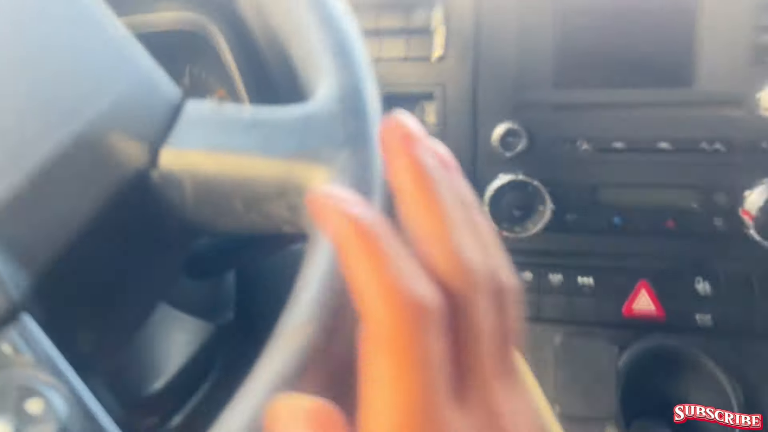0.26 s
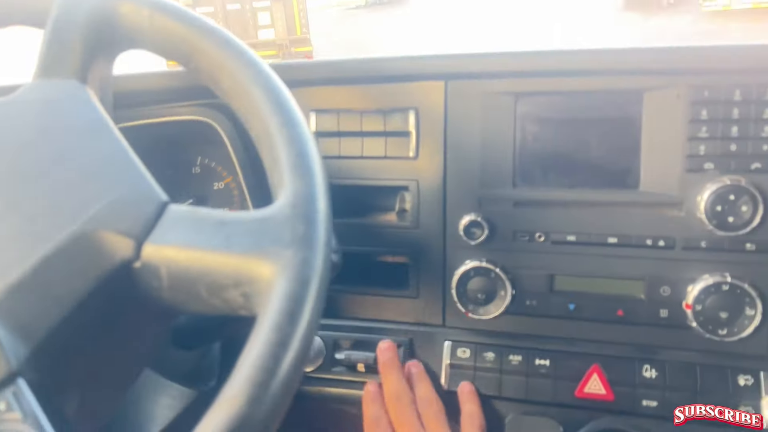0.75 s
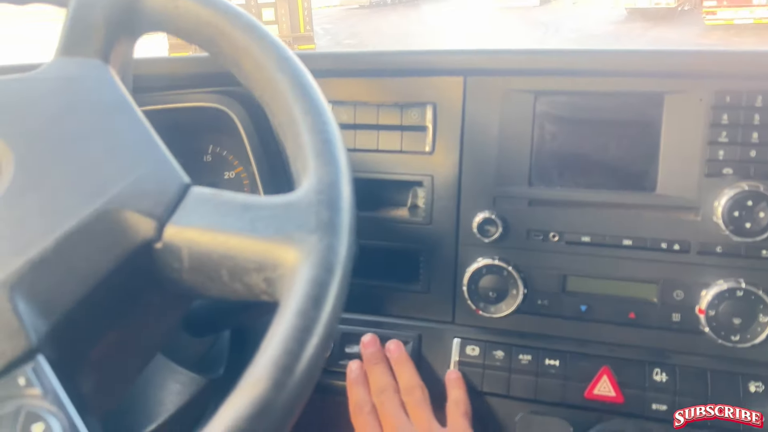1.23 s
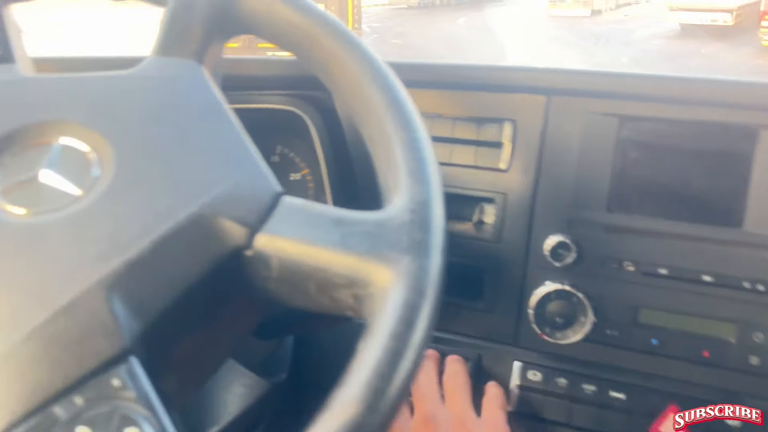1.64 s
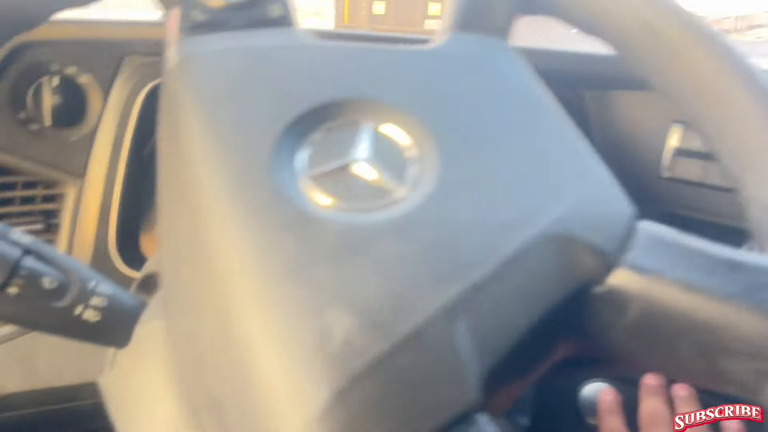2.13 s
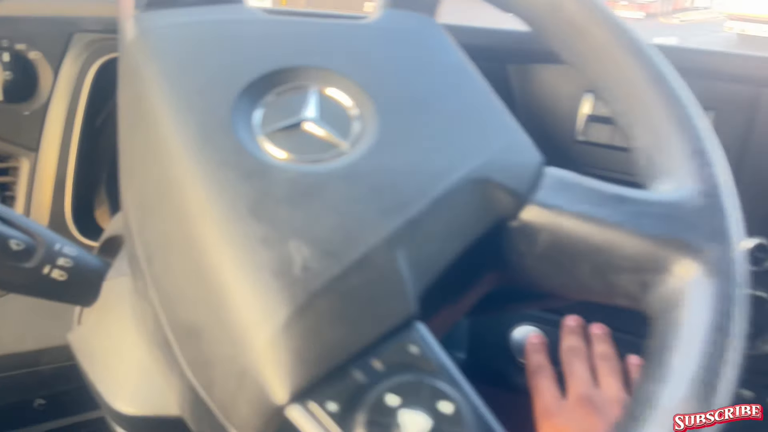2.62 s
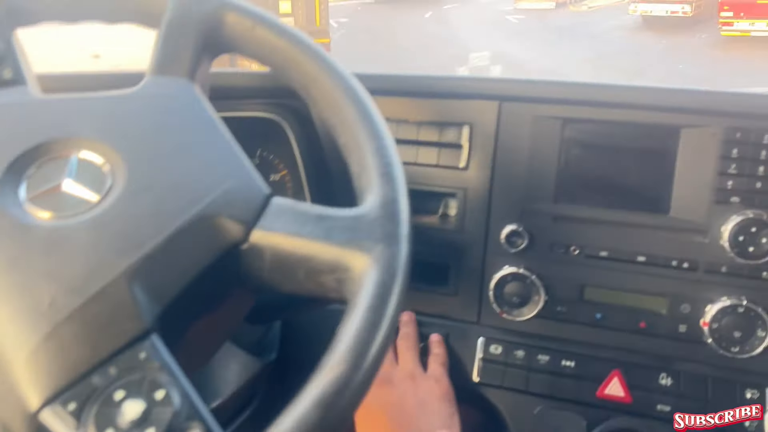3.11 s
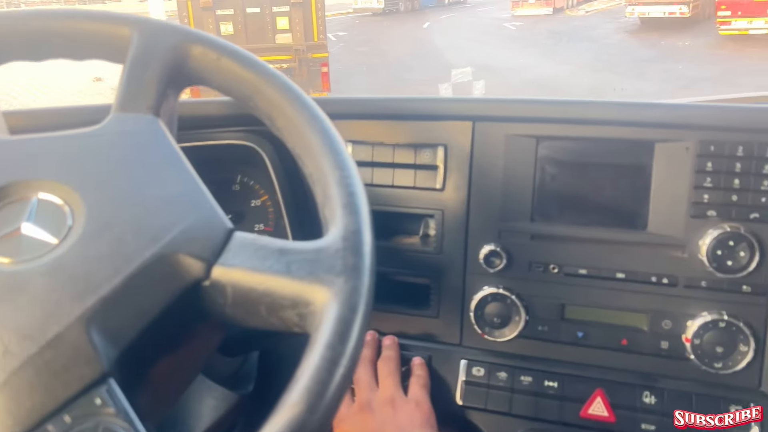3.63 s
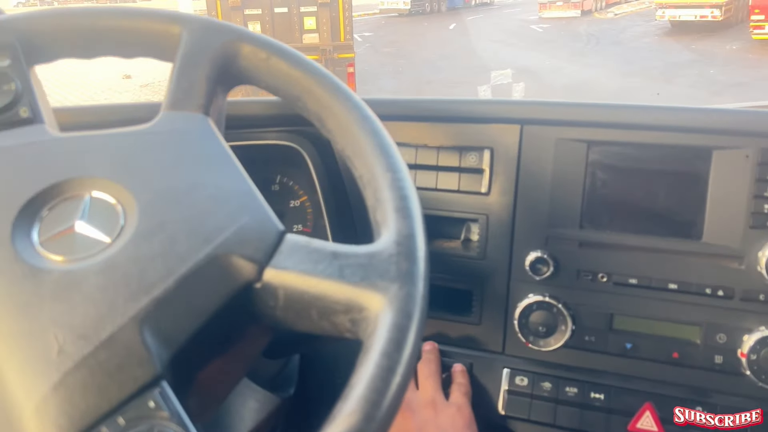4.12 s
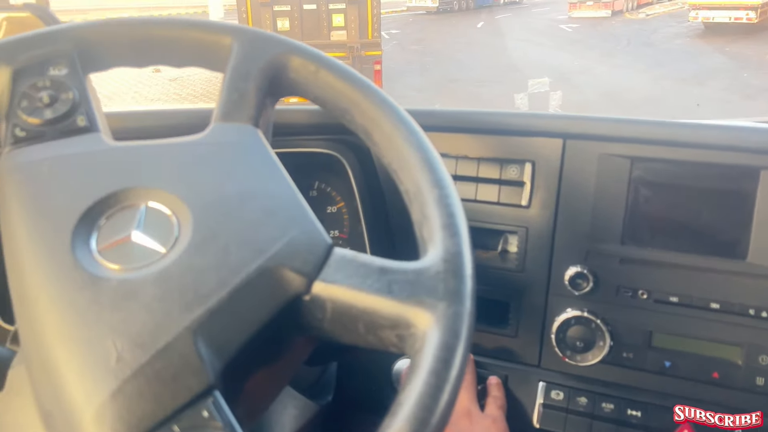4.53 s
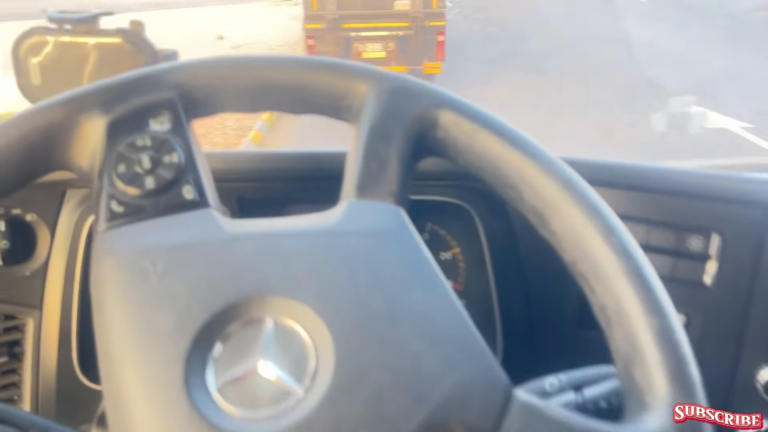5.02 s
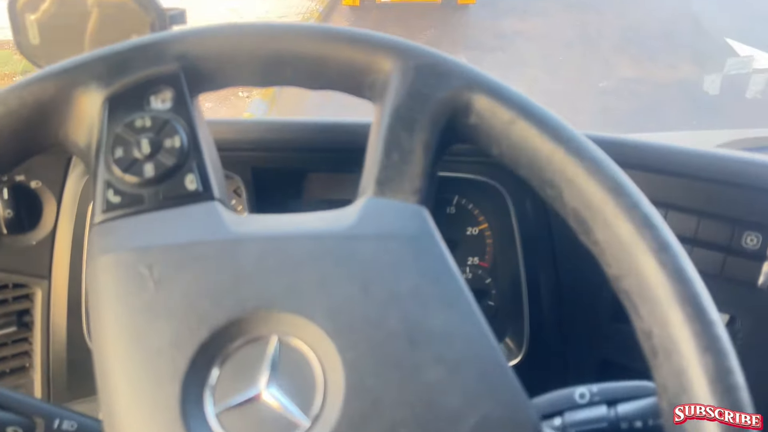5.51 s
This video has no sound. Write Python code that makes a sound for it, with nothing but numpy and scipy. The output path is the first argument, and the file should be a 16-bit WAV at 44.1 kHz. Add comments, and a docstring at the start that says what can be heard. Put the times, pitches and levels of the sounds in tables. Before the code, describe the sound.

A large diesel engine idles throughout, a deep, uneven, throbbing rumble heard inside a small truck cab, with faint air blowing from a vent more to the right. At the very start the handheld microphone is bumped hard, giving low, muffled thumps until about 0.3 s, with clicks and a strong rubbing hiss, as of a sleeve or hand, coloured by thin gliding squeaks until about 0.8 s. The drone dips briefly around 0.4 to 0.7 s. Small plastic clicks at 0.75 and 1.0 s lead to a sharp lever snap with a dull thud near 1.23 s. Softer rubbing hiss and light knocks return from 1.7 to 2.4 s, and a low hum swells around 2.3 to 2.8 s. A crisp double click comes at 3.4 s, as the lingering hiss stops. A duller knock follows at 3.9 s, then faint taps near 4.5 s and a tiny chirp at 4.7 s over the continuing idle.

```python
"""Inside the cab of a six-cylinder diesel truck at idle, heard from a phone held behind the steering wheel.
Beating hums and a rumble that throbs with the firings fill the cab; coloured noise blows from a vent.
The phone is bumped (decaying low swings); a hand works a lever on the dashboard. Bursts of rubbing hiss, as
of a sleeve or hand sliding, are noise with coloured resonances and thin whistles; the lever snaps home with
a thud, and plastic parts click as struck resonances amid scrapes and soft rubs of banded noise."""
import sys
import numpy as np
from scipy import signal
from scipy.fft import rfft, irfft
from scipy.io import wavfile
from scipy.ndimage import uniform_filter1d

SR = 44100
rng = np.random.default_rng(int(sys.argv[2]) if len(sys.argv) > 2 else 0)


def wrap_up_sound(samples):
    """Save the sound to the file named by the first command line argument, as 16-bit audio."""
    columns = np.atleast_2d(samples).T
    # keep every value between -1 and 1, then stretch to whole-number steps
    tamed = np.clip(columns, -1, 1)
    steps = np.round(tamed * 32767).astype(np.int16)
    wavfile.write(sys.argv[1], SR, steps)


N = 253575
T = np.arange(N) / SR


def undb(db):
    """Decibels to gain."""
    return 10 ** (np.asarray(db) / 20)


def unit(x):
    """Scale to rms 1."""
    return x / np.sqrt(np.mean(x ** 2))


def over_hz(rows, f):
    """Linear interpolation of (Hz, value) rows on a log-frequency axis."""
    hz, value = np.transpose(rows)
    return np.interp(np.log(f + 1), np.log(hz), value)


def colour(rows):
    """Spectral envelope: gain over frequency, closed below its first point."""
    return lambda f: undb(over_hz(rows, f)) * np.minimum(f / rows[0][0], 1) ** 2


def resonances(rows):
    """Superposition of resonance peaks: gain over frequency of (Hz, width, dB) rows."""
    return lambda f: sum(undb(db) / (1 + ((f - hz) / width) ** 2) for hz, width, db in rows)


def band(hz, width_hz):
    """Gain over frequency of a single resonance."""
    return resonances([(hz, width_hz, 0)])


# likeness of the two microphones in the cab's sound field, held within -1 to 1 in use:
# pitch_hz, correlation
LIKENESS = [(60, 0.92), (120, 0.79), (220, 0.85), (380, 0.56), (650, -0.23), (1400, 0.15), (2500, -0.067),
            (4500, 0.25), (5600, -0.39), (7300, 0.95), (9400, -1.75), (12000, 1), (14400, -1.4)]


def noise(gain, size=N, direct=0):
    """Spatial coherence: stereo noise of rms 1, more alike at the two microphones when the source is direct."""
    f = np.fft.rfftfreq(size, 1 / SR)
    alike = np.clip(direct + (1 - direct) * over_hz(LIKENESS, f), -1, 1)
    spectra = rfft(rng.standard_normal((2, size))) * gain(f)
    mid, side = spectra * np.sqrt([1 + alike, 1 - alike])
    return unit(irfft([mid + side, mid - side], size))


def walk(rate):
    """Slow random modulation of rms 1: levels held 1 / rate s and smoothed twice."""
    hold = int(SR / rate)
    steps = np.repeat(rng.standard_normal(N // hold + 1), hold)
    return unit(uniform_filter1d(uniform_filter1d(steps, hold), hold)[:N])


def swell(from_s, to_s, rise_db_per_s, fall_db_per_s):
    """Exponential envelope in dB: rises to 0 at from_s, holds until to_s, then falls."""
    return -rise_db_per_s * np.maximum(from_s - T, 0) - fall_db_per_s * np.maximum(T - to_s, 0)


def add(out, s, sound):
    """Superposition: mix a sound in at time s."""
    i = max(int(s * SR), 0)
    out[:, i:i + sound.shape[-1]] += sound[..., :N - i]


# hums of the engine and the units it drives: pitch_hz, level_db (rms, before the wavering)
HUMS = [(27.9, -45), (31.2, -49.5), (35.6, -47), (54.9, -41.5), (62.3, -43.5), (69.5, -46.5), (74.9, -45),
        (79, -48), (84, -44), (90.1, -46), (106.9, -48), (142.3, -56.5), (205, -59.5), (245, -66),
        (305, -68)]
HUM_WANDER, HUM_WAVER_DB = 0.00901, 3  # wander as a share of the pitch
# spectrum of the cab shell's rumble: pitch_hz, level_db (per Hz, relative)
RUMBLE = [(22, -63), (30, -61.5), (40, -72), (50, -61), (60, -51), (77, -51), (94, -57), (125, -60.5),
          (180, -63.5), (250, -68), (330, -73.5), (450, -82), (800, -88), (2000, -113)]
RUMBLE_DB, FIRING_HZ = -39, 27.9  # rms level before the levelling; rate of the firings
STEADY_S = 0.2  # time over which the idle's strength is averaged
# the drone dips briefly; the rate is that at which the depth grows and shrinks
DIP_FROM_S, DIP_TO_S, DIP_DB, DIP_DB_PER_S = 0.36, 0.71, -6.5, 120


def engine_hum(hz, db):
    """Frequency and amplitude modulation: one sine wanders in pitch and wavers in strength."""
    pitch = hz * (1 + HUM_WANDER * walk(1.995))
    amplitude = np.sqrt(2) * undb(db + HUM_WAVER_DB * walk(3.08))
    return amplitude * np.sin(2 * np.pi * (np.cumsum(pitch) / SR + rng.random()))


def engine(throb=0.21, lumpy_db=1):
    """Beating: close hums interfere unevenly over a rumble modulated at the firing rate."""
    hums = sum(engine_hum(hz, db) for hz, db in HUMS)
    firings = 1 + throb * np.cos(2 * np.pi * FIRING_HZ * T)
    drone = hums + undb(RUMBLE_DB) * unit(noise(colour(RUMBLE)) * firings)
    strength = unit(np.sqrt(uniform_filter1d(np.mean(drone ** 2, axis=0), int(STEADY_S * SR))))
    dip = DIP_DB * undb(swell(DIP_FROM_S, DIP_TO_S, DIP_DB_PER_S, DIP_DB_PER_S))
    # the square root halves the slow swings of level in dB
    return undb(dip + lumpy_db * walk(22.006)) * drone / np.sqrt(strength)


SURGE_FROM_S, SURGE_TO_S, SURGE_HZ = 2.3, 2.8, 108
SURGE_DB, SURGE_DB_PER_S = -41, 39  # rms level while held; rate at which it comes and goes


def surge(wander=.012):
    """Frequency modulation: a wavering low hum rises out of the drone and sinks back."""
    envelope = undb(SURGE_DB + swell(SURGE_FROM_S, SURGE_TO_S, SURGE_DB_PER_S, SURGE_DB_PER_S))
    pitch = SURGE_HZ * (1 + wander * walk(6))
    return np.sqrt(2) * envelope * np.sin(2 * np.pi * np.cumsum(pitch) / SR)


# low modes of the cab and the phone's body: pitch_hz, level_db (relative), t60_s
BOOM = [(65.5, -18, 0.065), (80.2, 5.5, 0.09), (111.3, -5, 0.24), (120, 5, 0.076), (167.8, 7, 0.1),
        (197.2, -1, 0.24), (242.2, 3, 0.12), (314, -2.5, 0.19), (350, -6.5, 0.1)]
# dull bumps: start_s, level_db (peak of the part common to both microphones), pitch_hz
BUMPS = [(.001, -5.5, 82), (.0, -10, 181), (.001, -21.5, 281), (.044, -17, 69.4), (.108, -23.5, 85.5),
         (.124, -28.5, 274), (0.137, -17.5, 72.5), (.156, -25.5, 338), (.159, -13.5, 127),
         (.167, -13.5, 264), (0.187, -20, 247), (0.189, -25, 66), (0.209, -20, 198), (.236, -31, 374),
         (.241, -23.5, 238), (0.261, -28, 197), (.274, -23.5, 78), (0.29, -26, 87), (1.202, -30, 292),
         (1.239, -29, 266), (1.252, -14, 126), (1.275, -17.5, 107.6), (1.276, -30.5, 320),
         (1.303, -28.5, 115), (2.024, -23.5, 65), (2.06, -26, 76), (2.966, -37, 330), (3.407, -32.5, 303),
         (3.905, -24.5, 176), (3.925, -27.5, 89)]
# spread of the modes each bump excites; its rise as a share of one cycle
BUMP_OCTAVES, BUMP_RISE_CYCLES = 0.7, 0.74
# share by which the pitch sags and time constant of the sag; level of the boom under the swing
BUMP_SAG, BUMP_SAG_S, BOOM_DB = 0.075, 0.024, -3.5


def bumps(side_db=-9, size=12000):
    """Modal excitation: a soft blow swings, sagging as the contact relaxes, and rings the low modes near it."""
    out, t = np.zeros((2, N)), np.arange(size) / SR
    hz, mode_db, t60 = np.transpose(BOOM)[:, :, None]
    for s, db, centre_hz in BUMPS:
        age = t * centre_hz / BUMP_RISE_CYCLES
        pitch = centre_hz * (1 + BUMP_SAG * (np.exp(-t / BUMP_SAG_S) - .5))
        swing = age * np.exp(1 - age) * np.exp(2j * np.pi * np.cumsum(pitch) / SR)
        nearness = np.exp(-.5 * (np.log2(hz / centre_hz) / BUMP_OCTAVES) ** 2)
        modes = undb(mode_db - 60 * t / t60) * nearness * np.exp(2j * np.pi * hz * t)
        boom = modes.sum(0) * (1 - np.exp(-age))
        thud = swing + undb(BOOM_DB) * boom / np.abs(boom).max()
        # the pressure gradient between the microphones is a quarter cycle out of step
        mid, side = thud.imag, undb(side_db) * thud.real
        add(out, s, undb(db) * np.array([mid + side, mid - side]) / np.abs(mid).max())
    return out


# bursts of rubbing hiss: start_s (at full strength), end_s (begins to die away),
# level_db (before the hiss gain)
HISSES = [(0., 0.836, -45.5), (1.7, 2.04, -48.5), (2.198, 2.44, -53.5)]
# every hiss swells, weakens and dies away
HISS_RISE_DB_PER_S, HISS_SAG_DB_PER_S, HISS_FALL_DB_PER_S = 66, 3, 47
# a faint hiss lingers, then stops; its level too is before the hiss gain
LINGER_DB, LINGER_ENDS_S = -60.5, 3.43


def hiss_strength(stop_db_per_s=130):
    """Envelope maximum: the strongest hiss at each moment, or else the lingering one."""
    levels = [LINGER_DB + swell(0, LINGER_ENDS_S, 0, stop_db_per_s)]
    for full_s, end_s, db in HISSES:
        sag = HISS_SAG_DB_PER_S * np.maximum(T - full_s, 0)
        levels.append(db - sag + swell(full_s, end_s, HISS_RISE_DB_PER_S, HISS_FALL_DB_PER_S))
    return undb(np.max(levels, axis=0))


# coloured resonances of the rub: pitch_hz, width_hz, level_db (relative)
RUB_MODES = [(1500, 220, 8.5), (1896, 45, 2.5), (2330, 300, 0), (3150, 190, -1.5), (3760, 480, -2.5),
             (4570, 130, -9)]
# they swell to one peak during the first hiss and fade
RUB_PEAK_S, RUB_DB, RUB_RISE_DB_PER_S, RUB_FALL_DB_PER_S = .275, -41.5, 95, 33
# their centre climbs: from, to, midpoint and time constant of the climb
RUB_LOW_HZ, RUB_HIGH_HZ, RUB_CLIMB_AT_S, RUB_CLIMB_S = 1620, 3030, 0.36, 0.039


def rub_resonances(spread_octaves=1):
    """Selective resonance: the coloured resonances nearest to a climbing centre sound the strongest."""
    climb = (1 + np.tanh((T - RUB_CLIMB_AT_S) / RUB_CLIMB_S)) / 2
    centre_hz = RUB_LOW_HZ + (RUB_HIGH_HZ - RUB_LOW_HZ) * climb
    weights = np.array([undb(db) * np.exp(-.5 * (np.log2(hz / centre_hz) / spread_octaves) ** 2)
                        for hz, _, db in RUB_MODES])
    weights /= np.sqrt((weights ** 2).sum(0))
    modes = sum(weight * undb(2.0 * walk(12.2)) * noise(band(hz, width), direct=0.89)
                for weight, (hz, width, _) in zip(weights, RUB_MODES))
    return undb(RUB_DB + swell(RUB_PEAK_S, RUB_PEAK_S, RUB_RISE_DB_PER_S, RUB_FALL_DB_PER_S)) * modes


# resonances of a thin singing hiss: pitch_hz, width_hz, level_db (relative)
SING = [(4585, 130, 2), (5300, 220, -12), (11900, 610, -13)]
# rms level at the start, and the rate at which it weakens
SING_FROM_S, SING_TO_S, SING_DB, SING_SAG_DB_PER_S = 1.72, 2.44, -61.5, 10


def thin_sing(fade_db_per_s=140, waver_db=1):
    """Resonance filtering: narrow bands of noise sing thinly during the later hisses."""
    sag = SING_SAG_DB_PER_S * np.maximum(T - SING_FROM_S, 0)
    level = SING_DB - sag + waver_db * walk(12.5)
    level = level + swell(SING_FROM_S, SING_TO_S, fade_db_per_s, fade_db_per_s)
    return undb(level) * noise(resonances(SING), direct=0.22)


# spectrum of the rubbing hiss: pitch_hz, level_db (per Hz, relative)
HISS_COLOUR = [(150, -73.5), (350, -69.5), (700, -83), (1100, -80.5), (1550, -78.5), (2400, -81),
               (3200, -91), (4400, -91), (5500, -95.5), (8200, -91.5), (11000, -100), (15000, -104)]


def rubbing_hiss(hiss_db=3, flutter_db=1):
    """Broadband noise: hiss as of a sleeve or hand sliding, its resonances and its singing flutter together."""
    hiss = undb(hiss_db) * hiss_strength() * noise(colour(HISS_COLOUR))
    return (hiss + rub_resonances() + thin_sing()) * undb(flutter_db * walk(35.56))


# brief thin whistles: start_s (fully sounding), end_s (begins to fade), pitch_hz (at the start),
# glide_hz_per_s, level_db (amplitude at full sound)
WHISTLE_GLIDES = [(0.096, 0.15, 1380, -1, -48), (0.255, 0.335, 1500, 1198, -42),
                  (.26, .33, 1690, 900, -49.5), (0.282, 0.353, 3060, 2701, -52),
                  (0.32, .43, 3900, -2200, -58), (.33, 0.4, 4520, -1600, -57),
                  (.35, 0.44, 3990, -1800, -63), (.45, .54, 4150, -1200, -57),
                  (.46, 0.495, 3930, 1200, -56), (0.448, 0.51, 4540, 1000, -57.5),
                  (0.465, 0.524, 3130, -200, -56), (0.65, .73, 3140, -100, -59.5),
                  (0.48, 0.7, 3800, -200, -60)]
TONE_WANDER, TONE_FADE_DB_PER_S = .008, 300  # each of two wanders as a share of the pitch; fade in and out


def gliding_whistles(side_db=-7):
    """Frequency modulation: brief, thin whistles within the rubbing glide and waver."""
    out = np.zeros((2, N))
    for from_s, to_s, hz, glide_hz_per_s, db in WHISTLE_GLIDES:
        glide = glide_hz_per_s * (np.clip(T, from_s, to_s) - from_s)
        pitch = hz * (1 + TONE_WANDER * (walk(28.07) + walk(120.2))) + glide
        tone = unit(1 + .8 * walk(160)) * np.exp(2j * np.pi * np.cumsum(pitch) / SR)
        envelope = undb(db + swell(from_s, to_s, TONE_FADE_DB_PER_S, TONE_FADE_DB_PER_S))
        out += envelope * (tone.imag + undb(side_db) * tone.real * [[1], [-1]])
    return out


def click_shape(t, t60, contact_s=.0016, tail_db=-24, cab_t60=0.21):
    """Impact and decay: a quick rise in contact, the struck part's fall and a weak tail from the cab."""
    return (1 - np.exp(-t / contact_s)) * (undb(-60 * t / t60) + undb(tail_db - 60 * t / cab_t60))


def ring(hz, t, skew=0.21, strike_db=2.5, damping_db_per_s=450, damping_per_khz=170, split=0.073, twin_db=-7):
    """Damped mode pair: a mode and its weaker twin, damped faster the higher the mode lies."""
    modes = 0
    for f, db in [(hz, 0), (hz * (1 + split), twin_db)]:
        # the two microphones hear it a share of a cycle apart
        cycles = f * t + rng.random() + np.array([[0], [skew]])
        modes = modes + undb(db) * np.sin(2 * np.pi * cycles)
    damping = damping_db_per_s + damping_per_khz * hz / 1000
    return undb(strike_db - damping * t) * modes


# resonances of the dashboard panels: pitch_hz, width_hz, level_db (relative)
KNOCK = [(315, 71, 5), (450, 16, -10), (567, 51, 4.5), (775, 37, 4.5), (953, 113, -3), (1220, 78, -4),
         (1418, 28, 1.5), (1900, 160, -13.5), (2120, 380, -9.5)]
# resonances of the small plastic parts: pitch_hz, width_hz, level_db (relative)
SNAP = [(1720, 140, -31), (2250, 240, 6.5), (2710, 44, 2), (3200, 340, 0), (3700, 33, 3), (4480, 880, -5),
        (5160, 210, -13), (5700, 180, -17), (7300, 2300, -9)]
# spectrum of the contact's tick: pitch_hz, level_db (relative)
TICK = [(4500, -27), (7300, -7), (8500, 0.5), (10500, -4), (13000, -14.5), (16000, -9)]
# clicks of the lever and dashboard: start_s, level_db (base of all layers), hardness (0-1),
# panel_pitch_hz, panel_level_db, part_pitch_hz, part_level_db
# (ring levels are over the base, before the gain of the strike)
CLICKS = [(.157, -33, 0.58, 360, 5, 2590, -9), (.169, -31.5, 0.69, 350, 10, 5160, -9),
          (.238, -29.5, 0.45, 368, 2, 2030, -5), (.744, -36.5, 0, 796, -3, 2400, -3),
          (.753, -35.5, 0.53, 940, -1.5, 2690, -6), (1.021, -39.5, 0.43, 930, -2, 2030, -15),
          (1.034, -51, 1, 430, 3, 3430, -16), (1.061, -40.5, 0.89, 510, 4.5, 1330, 4),
          (1.08, -36.5, .03, 720, 2, 1240, -5), (1.182, -36, 0.28, 880, 3, 1930, -12),
          (1.202, -48.5, 1, 1100, 1, 2810, 11), (1.223, -36, 0.94, 920, 10, 2180, 5),
          (1.234, -26, 0.98, 1220, -7, 2267, 0), (1.238, -29, .5, 1050, -3, 3325, 4),
          (1.24, -27.5, 0.1, 770, 2, 1410, -1), (1.246, -31.5, 0.2, 710, 1, 2380, -9),
          (1.271, -38.5, 0.8, 1230, -3, 3200, 4), (1.524, -43, 0, 452, 5, 1110, -2),
          (1.688, -38.5, .2, 763, 0, 1040, -5), (1.706, -45, .1, 640, 2, 1200, -3),
          (1.789, -45, 0.86, 553, -2, 1230, -11), (1.947, -45.5, .1, 982, -2, 1520, -13),
          (1.968, -38, 0.55, 850, 0, 1310, -2), (1.999, -36.5, 0.71, 940, -4, 2460, -4),
          (2.04, -47, .1, 417, 3, 1500, -6), (2.07, -47, .2, 990, 3, 1550, 0),
          (2.345, -42, 0.89, 900, -1, 2010, 2), (2.348, -45, 0.86, 1320, -6, 4730, 8),
          (2.965, -54.5, 0, 450, 17, 610, -3), (2.998, -43, 0.91, 1260, 4, 3380, -6),
          (3.39, -37.5, .9, 880, -8, 2570, -6), (3.406, -31.5, 0.66, 467, 5.5, 2310, -0.5),
          (3.41, -36, .1, 958, 3, 1730, 4), (3.416, -42.5, 0.1, 570, 5, 1180, 5),
          (3.897, -42, 0.64, 696, -2, 2480, 2), (3.904, -34.5, 0, 762, 6.5, 1790, -6),
          (4.01, -42, 0.64, 1270, 4, 2200, -2), (4.058, -42.5, 0.45, 733, 7, 1360, -9),
          (4.5, -45, 0.35, 954, 4.5, 1890, 5), (4.503, -39, 0, 605, 4.5, 1530, 7.5),
          (4.649, -44.5, 0, 490, 0, 1160, -3), (4.884, -46, 0.66, 2200, 6, 3350, -1)]
SOFT_SNAP_DB, SOFT_TICK_DB = -23, -48.5  # change of snap and tick for a fully soft contact
# the clicks start on the left and drift across as the phone turns (left minus right)
CLICK_PAN_DB, CLICK_PAN_DB_PER_S = 3.5, -1


def clicks(knock_db=1, snap_db=4, tick_db=6.5, size=6000):
    """Impact excitation: a panel and a small part ring; a harder contact adds more treble."""
    out, t = np.zeros((2, N)), np.arange(size) / SR
    for s, db, hardness, panel_hz, panel_db, part_hz, part_db in CLICKS:
        softness = 1 - np.clip(hardness, 0, 1)
        knock = undb(knock_db) * noise(resonances(KNOCK), size, direct=0.18)
        panel = knock + undb(panel_db) * ring(panel_hz, t)
        snap = undb(softness * SOFT_SNAP_DB + snap_db) * noise(resonances(SNAP), size, direct=0.05)
        part = snap + undb(part_db) * ring(part_hz, t)
        tick = undb(softness * SOFT_TICK_DB + tick_db) * noise(colour(TICK), size)
        sound = panel * click_shape(t, t60=0.065, contact_s=0.0024)
        sound += part * click_shape(t, t60=0.049) + tick * click_shape(t, t60=0.027)
        pan = CLICK_PAN_DB + CLICK_PAN_DB_PER_S * s
        add(out, s, sound * undb(db + np.array([[pan], [-pan]]) / 2))
    return out


# scrapes and soft rubs of hand and plastic: start_s, length_s,
# level_db (rms at the crest, before the slips), pitch_hz
SCRAPES = [(.165, 0.029, -47.5, 4800), (.738, .04, -44, 895), (1.073, 0.07, -51, 900),
           (1.22, .008, -45, 5900), (1.224, .007, -46, 3100), (1.235, .009, -35, 3200),
           (1.269, .011, -43, 8100), (1.678, 0.045, -54, 740), (1.931, 0.12, -52, 1000),
           (1.98, .1, -53.5, 430), (3.385, 0.012, -48, 3380), (3.404, 0.021, -47, 4550),
           (3.408, 0.018, -45, 2850), (3.886, .025, -65, 11500), (4.04, 0.027, -66, 11000),
           (4.453, 0.085, -65, 11500), (4.497, .01, -58, 8750)]
SCRAPE_WIDTH = 0.11  # width of the band as a share of its centre
SLIPS_PER_S, SLIP_SCATTER_DB = 450, 6


def scrapes(size=6000):
    """Stick-slip friction: dense, uneven tiny slips swell and fade in one band."""
    out, t = np.zeros((2, N)), np.arange(size) / SR
    slips = unit(undb(SLIP_SCATTER_DB * walk(SLIPS_PER_S)))
    for s, length_s, db, hz in SCRAPES:
        envelope = np.sin(np.pi * np.minimum(t / length_s, 1))
        add(out, s, undb(db) * envelope * noise(band(hz, SCRAPE_WIDTH * hz), size, direct=0.23))
    return out * slips


SQUEAK_S, SQUEAK_HZ, SQUEAK_DB, SQUEAK_LENGTH_S = 4.694, 5170, -64, 0.015  # level at the crest


def squeak(width_hz=160):
    """Friction noise in a narrow band: a plastic part slips and gives one tiny, rough chirp."""
    envelope = np.sin(np.pi * np.clip((T - SQUEAK_S) / SQUEAK_LENGTH_S, 0, 1)) ** 2
    return undb(SQUEAK_DB) * envelope * noise(band(SQUEAK_HZ, width_hz), direct=0.87)


# spectrum of the air from the dashboard vent: pitch_hz, level_db (per Hz, relative)
VENT = [(500, -94), (850, -88), (1020, -77.5), (1280, -83.5), (1550, -77.5), (1800, -73), (2000, -80.5),
        (2350, -83.5), (2750, -101), (4000, -115)]
# balance of the vent, which lies to the right of the phone: pitch_hz, level_db (left minus right)
VENT_PAN = [(60, -1), (110, 2), (200, 13), (380, 4), (700, 11), (1290, -14.5), (2380, -16), (4400, -20),
            (8120, -31), (15000, 22)]
# spectrum of the faint smooth hiss above it: pitch_hz, level_db (per Hz, relative)
SIZZLE = [(1500, -102), (3200, -100), (4200, -103), (5000, -112), (6000, -113), (7600, -106), (8600, -107),
          (10300, -112), (13000, -111), (15500, -111)]
# thin whistles in the vent: pitch_hz, width_hz, level_db (rms)
WHISTLES = [(9150, 130, -77), (11000, 25, -86)]
VENT_DB, SIZZLE_DB = -54.5, -66.5  # vent level before the panning; sizzle level rms


def vent(lag_s=0.00019, direct=0.31):
    """Arrival-time difference: the blower's rush reaches the right microphone first, with hiss and whistles."""
    f = np.fft.rfftfreq(N, 1 / SR)
    pan = undb(over_hz(VENT_PAN, f) / 2)
    left_delay = np.exp(-2j * np.pi * f * lag_s)
    rush = irfft(rfft(noise(colour(VENT), direct=direct)) * [pan * left_delay, 1 / pan], N)
    whistles = sum(undb(db) * noise(band(hz, width)) for hz, width, db in WHISTLES)
    return undb(VENT_DB + 0.29 * walk(5.4)) * rush + undb(SIZZLE_DB) * noise(colour(SIZZLE)) + whistles


# echoes from the windscreen, roof and door: left_delay_s, right_delay_s, level_db
ECHOES = [(.0023, .0025, -48), (.0047, .0044, -12.5), (.0079, .0083, -21), (0.0134, .0119, -12)]


def cab(x):
    """Early reflections: nearby glass and trim throw the sound back within milliseconds."""
    out = x.copy()
    for left_s, right_s, db in ECHOES:
        add(out, left_s, undb(db) * x * [[1], [0]])
        add(out, right_s, undb(db) * x * [[0], [1]])
    return out


def scene():
    """Superposition of everything heard in the cab; the sounds of hand and lever also reflect."""
    handling = rubbing_hiss() + gliding_whistles() + clicks() + scrapes() + squeak()
    return engine() + surge() + bumps() + cab(handling) + vent()


TOP_HZ = 15850


def record(dry):
    """Low-pass filtering: the phone cuts the top."""
    return signal.sosfilt(signal.ellip(10, .2, 80, TOP_HZ, fs=SR, output="sos"), dry)


dry = scene()
out = record(dry)
wrap_up_sound(out)
```